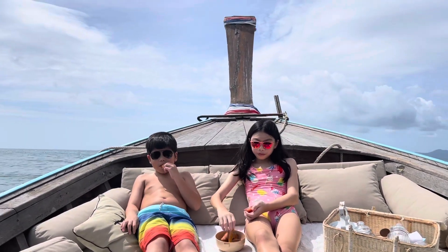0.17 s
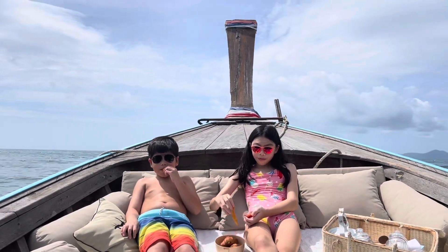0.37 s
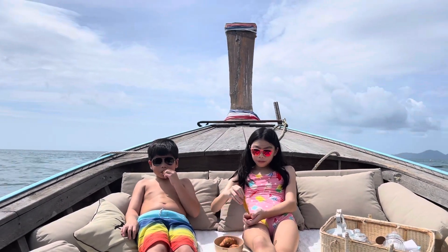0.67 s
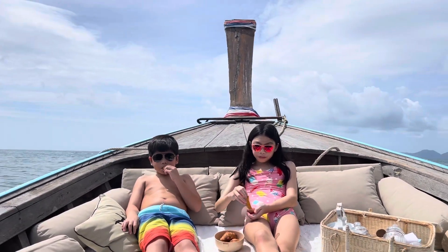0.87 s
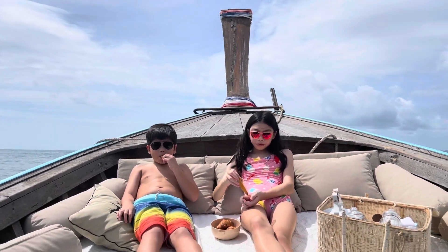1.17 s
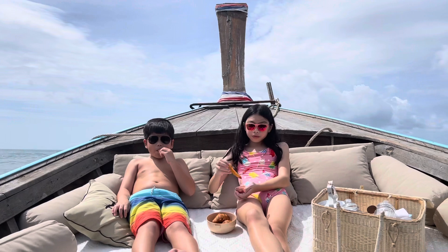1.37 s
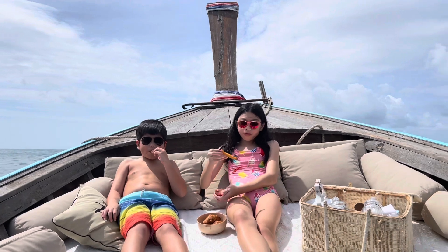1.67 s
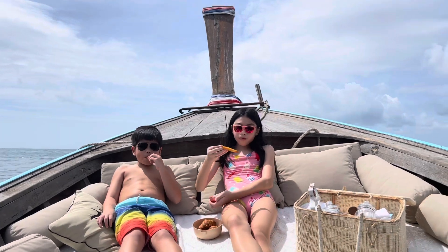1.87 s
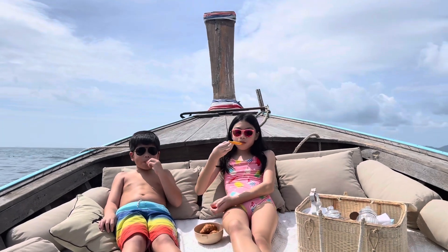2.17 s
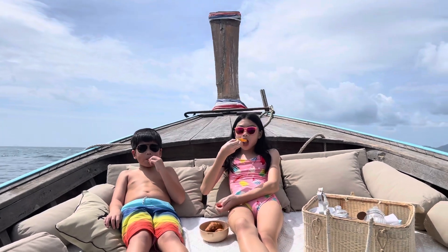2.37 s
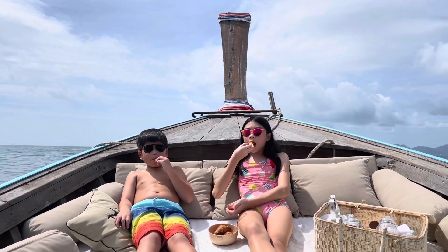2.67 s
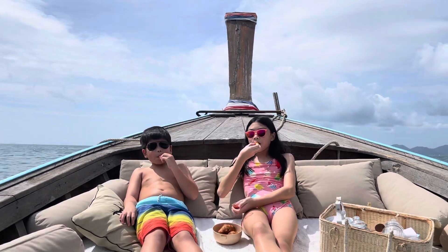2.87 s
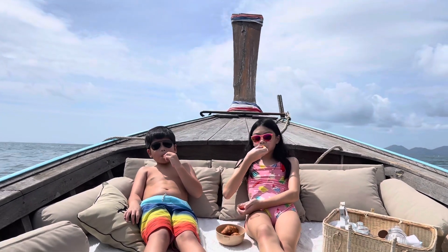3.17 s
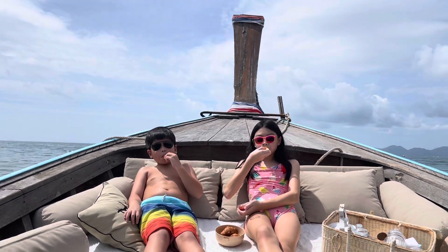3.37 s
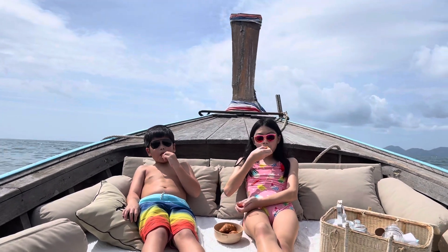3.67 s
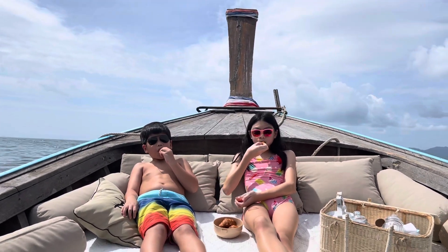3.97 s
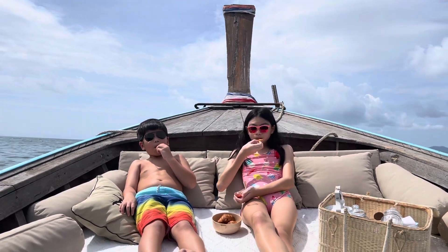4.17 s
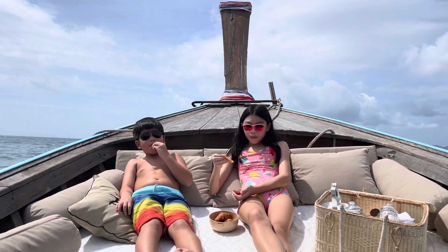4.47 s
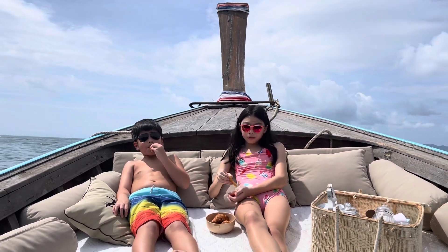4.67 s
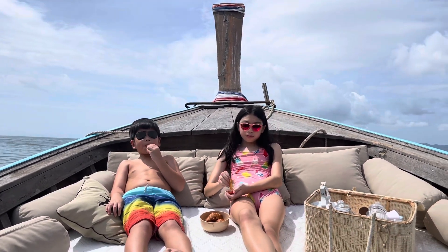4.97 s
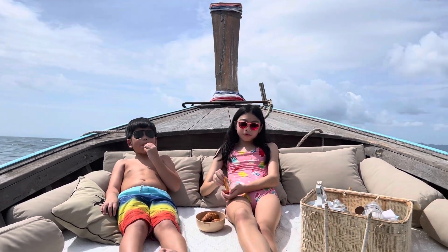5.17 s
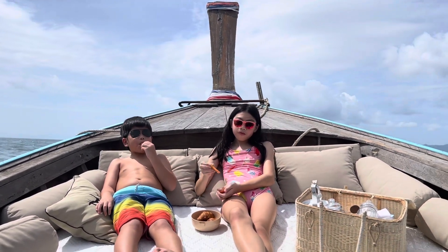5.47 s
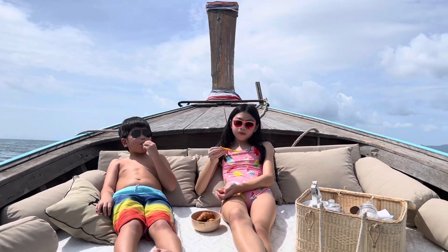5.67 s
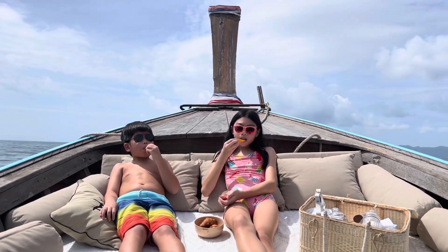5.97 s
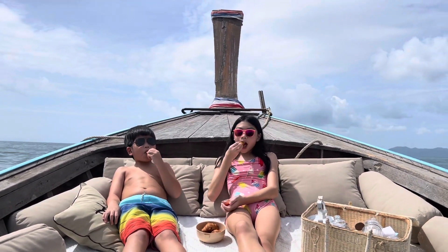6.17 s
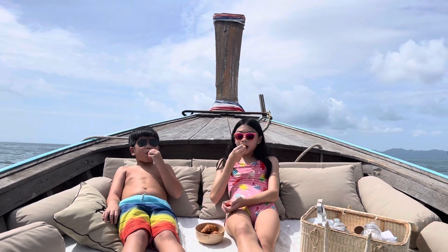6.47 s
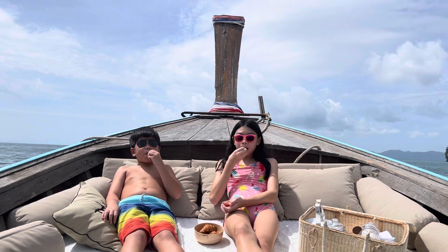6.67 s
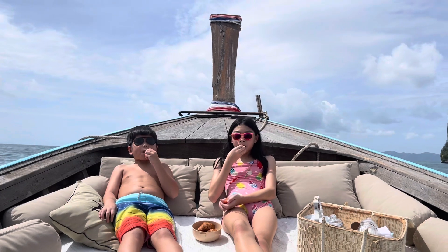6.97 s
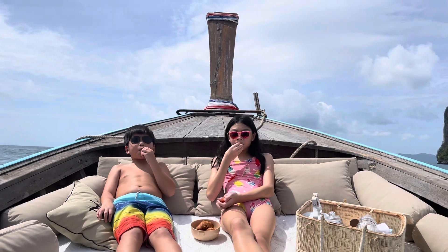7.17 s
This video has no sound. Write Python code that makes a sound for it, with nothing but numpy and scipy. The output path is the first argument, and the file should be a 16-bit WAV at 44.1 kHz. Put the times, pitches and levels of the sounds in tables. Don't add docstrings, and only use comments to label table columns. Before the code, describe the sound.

A diesel boat engine runs throughout, heard from the open wooden deck ahead of it. A deep throbbing drone near 75 Hz wavers as the hull resonates, beneath a fast, puffing, clattering mid-range roar and a faint fuzzy whistle around 5.5 kHz. From 0 to 3.4 s, gusts buffet the stereo microphone with low rumble, flutter and blunt slaps, especially heavy around 1.1-1.4 s. Foamy spray hisses softly alongside, swelling near 0.2, 0.9, 1.3 and 2.8 s. After 3.4 s the wind gradually eases, though isolated thumps continue through 4.3-5 s. A tiny sharp water tick lands close at 4.7 s. Around 5.2 s the engine races slightly and its whistle rises and strengthens; another wash follows near 5.5 s. The engine then slackens, pitch sagging, in the calmest wind around 6-6.7 s, before gusts return by 7.2 s, with the engine still running.

```python
import sys
import numpy as np
from scipy import signal
from scipy.fft import rfft, irfft, next_fast_len
from scipy.io import wavfile
from scipy.ndimage import uniform_filter1d

SR = 44100
rng = np.random.default_rng(int(sys.argv[2]) if len(sys.argv) > 2 else 0)


def decibels_to_gain(level_db):
    exponent = np.asarray(level_db, float) / 20
    return 10 ** exponent


def bounce(signal):
    frames = np.transpose(np.atleast_2d(signal))
    limited = np.clip(frames, -1, 1)
    pcm = np.round(limited * 32767).astype(np.int16)
    wavfile.write(sys.argv[1], SR, pcm)


N = 323253
TIME = np.arange(N) / SR

# pitch_hz, likeness [0-1], right_lead [radians], left_over_right_db
PORT_SPREAD = [(60, 1, 0.29, -6.5), (494, 0.07, -0.53, 0.5), (1130, 0.62, -0.68, -1.5),
               (1780, 0.5, -0.14, -3), (2400, 0.3, -1.28, -1.5), (3840, 0.12, -0.36, 2.5),
               (5200, 0.36, -1, 2), (6900, 0.23, -0.34, 5), (7400, 0.3, 0.33, -1), (7640, .6, -1.1, 3),
               (8450, .99, 0, 0)]
# pitch_hz, likeness
PORT_SPREAD_TOP = [(8450, 1, 0), (8850, 1, 0), (9100, .8, 1.1), (9600, .8, 2.1), (9780, .9, 2.65),
                   (10050, .97, 3.03), (10150, 1, 3.1416), (10330, 1, 3.1416), (10450, .95, 3.4),
                   (10700, .85, 3.8), (11600, .85, 5.7), (11800, .95, 6.2832)]

CALM_WIND_DB = [-31, -25, -32, -35.5]
LULL_FOLLOW = [0.054, 1.0, 0.38, 0.58]
# start_s, level_db
WIND_LULL = [
    (0, 1),
    (3.4, 0),
    (5, -6.5),
    (5.4, -10.5),
    (6.7, -11),
    (7.33, -1),
]
# centre_s, half_length_s, rumble_alike_db, rumble_apart_db, flutter_db
WIND_GUSTS = [(.08, 0.076, 3, 2, 6), (.45, 0.17, 6.5, 5, 7.5), (.66, 0.074, 1.5, 3, 4),
              (.86, 0.16, 2, 5, 2), (1.2, 0.1, 8.5, 5, 7.5), (1.43, 0.094, -1, 4.5, 4.5),
              (1.71, 0.076, 6, 5, 3), (1.97, 0.11, 4.5, 3, 2), (2.31, .08, 1, 0, 8),
              (2.5, 0.37, 3, 2, -0.3), (2.8, .1, 2, 3, 6.5), (3.07, 0.085, 5.5, 10.5, 3.5),
              (3.31, 0.048, 9.5, 2, 5.5), (3.52, 0.12, 9, 0, -1), (1.03, 0.031, 0, -12, -1),
              (4.3, 0.22, 5, 8, 7), (4.59, 0.056, 7, -1, -1), (4.82, 0.082, 10.5, 7, 5),
              (4.98, 0.083, 4.5, 11, 3.5), (5.38, 0.096, 3, 1, 8.5), (5.92, 0.24, 3, 11.5, 2.5),
              (6.25, 0.2, 2.5, 4, 4.5), (6.88, 0.12, 1, 10.5, -7), (7.2, 0.15, 6.5, 4.5, 3.5)]
# start_s, left_over_right_db
WIND_SIDE = [
    (0, -0.5),
    (2.7, -0.4),
    (3.6, -1),
    (4.7, 0.2),
    (5.3, 0.5),
    (6.8, -0.5),
    (7.33, -.3),
]
# pitch_hz, level_db [per Hz]
RUMBLE_TONE = [(20, -30), (35, -8.5), (60, 0), (110, -1.5), (200, -8), (300, -18), (500, -29.5)]
# pitch_hz, level_db [per Hz]
RUMBLE_APART_TONE = [(25, -34), (38, -14), (62, -3.5), (110, -3.5), (200, -7.5), (300, -15), (500, -40)]
# pitch_hz, level_db [per Hz]
FLUTTER_TONE = [(120, -54), (220, -2.5), (320, 3), (500, -3.5), (800, -4.5), (1300, -19.5)]
# centre_s, peak [full scale], pitch_hz, length [cycles]
AIR_SLAPS = [(.372, .2, 350, 1.5), (.457, .2, 270, 1), (.485, .2, 220, 1), (.51, .13, 600, .8),
             (.67, .07, 650, 1.2), (.737, .2, 250, 1), (.8, .2, 240, 1), (1.136, .2, 700, 1.3),
             (1.1405, -.46, 380, 1.4), (1.204, -.3, 200, 1.2), (1.231, .28, 600, 1), (1.2495, -.6, 120, 1),
             (1.272, .12, 600, 1.2), (1.308, -.35, 170, .7), (1.4, -.3, 150, .7), (2.7, .18, 190, 4),
             (3.3, .2, 320, 1.2), (3.342, .3, 130, 1.2), (3.595, -.35, 170, .6), (3.631, .3, 280, .7),
             (3.642, .4, 160, .6), (4.32, .3, 210, 1), (4.335, .15, 500, 1.5), (4.654, .3, 150, .6),
             (4.727, -.35, 190, .8), (4.797, -.3, 110, .7), (6.453, -.35, 150, .6), (7.222, -.3, 150, .6)]

# pitch_hz, level_db [per Hz]
FOAM_TONE = [(1500, -6), (3000, 1.5), (5000, -5), (8300, -0.5), (10300, 3.5), (11500, 1.5), (12100, -6),
             (12500, -12), (12900, -18), (13300, -30)]
# centre_s, half_length_s, level_db [over steady foam]
BOW_WAVES = [(.2, .3, 5.5), (.9, 0.15, 4.5), (1.3, 0.15, 9.5), (1.53, 0.08, 5.5), (2.65, .2, 2),
             (2.81, 0.097, 10), (3.0, 0.06, 6), (5.52, 0.21, 5), (6.57, .08, 3), (6.95, .04, 2),
             (7.28, .12, 3)]
# start_s, peak_db
CLOSE_DROP = [
    (4.705, -22),
]

# start_s, pitch_hz, level_db
WHISTLE = [(0, 5350, -47), (.27, 5280, -45), (.45, 5460, -43), (.7, 5490, -43), (.85, 5480, -51),
           (1.3, 5480, -49), (1.7, 5400, -46), (2, 5460, -50), (2.6, 5700, -48.5), (4, 5790, -49.5),
           (4.35, 5860, -42.5), (4.8, 5870, -44), (5.25, 5900, -40), (5.55, 5870, -42), (5.9, 5670, -49),
           (6.3, 5420, -47), (6.82, 5400, -44), (7.08, 5220, -48)]

# pitch_hz, level_db [per Hz]
ROAR_TONE = [(180, -10), (300, -10), (420, -11), (700, -8.5), (890, -8), (1150, -2.5), (1600, -6.5),
             (1780, -10), (2600, -13), (3600, -26), (6000, -25.5), (8300, -40)]
# pitch_hz, width_hz, level_db
BLOCK_RINGS = [(577, 82, -9.5), (778, 29, -22), (1033, 34, -11), (1114, 23, -15), (1328, 26, -20),
               (1450, 48, -19), (1604, 176, -9), (1880, 35, -15), (2066, 32, -19.5), (2264, 31, -23.5),
               (2780, 63, -30.5)]
# pitch_hz, width_hz, level_db
HULL_RINGS = [(255.5, 29.6, 2), (357, 26, -7)]
# centre_s, half_length_s, roar_db
PROPELLER_BITES = [
    (1.87, .06, -1),
    (2.0, 0.024, 1),
    (2.8, 0.13, 2),
    (3.3, 0.54, -1),
    (4.95, 0.32, 1),
    (6.45, 0.077, 0),
    (7.0, 0.16, -2),
]

# start_s, crank_speed [rev/s]
CRANK_SPEED = [(0, 35.9), (.2, 36), (.8, 38.5), (1.4, 38.1), (1.8, 37.2), (2.2, 39.1), (2.8, 39.2),
               (3, 38.5), (3.8, 38.1), (4.2, 39), (4.7, 38.7), (5, 40.2), (5.4, 40.3), (5.8, 37.7),
               (6.4, 36.7), (6.8, 36.8), (7.1, 35.8), (7.33, 35.7)]
# order [times crank speed], panel followed [index], level_db [against that panel]
CRANK_ORDERS = [(2, 0, 0), (3, 1, -.3), (4, 2, 0), (1, 1, -3.5), (5, 2, -8), (6, 1, -5), (2.5, 1, -9),
                (1.5, 2, -14), (6.5, 2, -8), (7, 2, -9), (9, 2, -16), (9.5, 2, -15)]
# order picked out, pitch_hz, width_hz, peak_rms_db
HULL_PANELS = [
    (2, 73, 5, -20.5),
    (3, 119.5, 4, -26),
    (4, 152, 18, -26.5),
]
# centre_s, half_length_s, order_2_db, order_3_db, order_4_db
HULL_SWELLS = [(0, 0.13, -18, 0, 2), (.45, 0.19, -1, -4, -8.5), (.8, 0.098, -18, -4, -4),
               (1.2, 0.48, -1, 3, 1), (1.97, 0.18, 5, 2, -8), (2.2, 0.079, -7, -1, -1),
               (2.6, 0.11, 2.5, -1, -6.5), (3.1, 0.17, -8, 3, -1), (3.5, .2, -3, 4, -1.5),
               (3.75, 0.15, 3, 2, -1.5), (4, 0.095, -8, -3, 2.5), (4.2, 0.084, 8.5, 0, 1),
               (4.4, .09, -1, 0, -0.5), (4.9, 0.18, 2.5, -3.5, -2.5), (5.75, 0.19, -9, -1, 0.5),
               (6.6, 0.17, 4, 3, -0.5), (7.2, 0.12, -4, 6, 1.5), (7.36, .1, 4, 0, -2)]

# from_hz, silent [% of the time]
FAINT_TOP = [(12440, 55), (12850, 78), (13000, 93)]


def evened(x):
    return x / np.sqrt(np.mean(x ** 2) + 1e-20)


def curves(rows):
    s, *columns = np.transpose(rows)
    return [np.interp(TIME, s, column) for column in columns]


def bumps(rows):
    s, half, *columns = np.transpose(rows)
    coarse = TIME[::64]
    bells = np.exp(-((coarse[:, None] - s) / half) ** 2)
    return np.array([np.interp(TIME, coarse, bells @ column) for column in columns])


def wander(hz, count=1):
    size = max(int(SR / hz), 1)
    smooth = uniform_filter1d(rng.standard_normal((count, N)), size)
    return evened(uniform_filter1d(smooth, size))


def coloured(x, points):
    hz, db = np.transpose(points)
    size = next_fast_len(N)
    log_hz = np.log(np.fft.rfftfreq(size, 1 / SR) + 1)
    gain = decibels_to_gain(np.interp(log_hz, np.log(hz), db, left=-90, right=-90))
    return evened(irfft(rfft(x, size) * gain, size)[..., :N])


def resonate(x, hz, width):
    r = np.exp(-np.pi * width / SR)
    if np.isscalar(hz):
        pole = r * np.exp(2j * np.pi * hz / SR)
        return 2 * signal.lfilter([1 - r], [1, -pole], x).real
    turn = np.exp(2j * np.pi * np.cumsum(hz) / SR)
    return 2 * (turn * signal.lfilter([1 - r], [1, -r], x / turn)).real


def patchy(x, depth_db, bins, frames):
    z = signal.stft(x, nperseg=512)[2]
    patches = uniform_filter1d(rng.standard_normal(z.shape[1:]), max(int(bins), 1), 0)
    patches = uniform_filter1d(patches, max(int(frames), 1), 1)
    return evened(signal.istft(z * decibels_to_gain(depth_db * evened(patches)), nperseg=512)[1][:, :N])


def ports(x, twin):
    size = next_fast_len(N)
    f = np.fft.rfftfreq(size, 1 / SR)
    rows = PORT_SPREAD[:-1] + [row + (0,) for row in PORT_SPREAD_TOP]
    hz, like, lead, pan_db = np.transpose(rows)
    like = np.clip(np.interp(f, hz, like), 0, 1)
    left = rfft(x, size)
    right = like * left + np.sqrt(1 - like ** 2) * rfft(twin, size)
    right = right * np.exp(1j * np.interp(f, hz, lead))
    tilt = decibels_to_gain(np.interp(f, hz, pan_db) / 2)
    return irfft(np.array([left * tilt, right / tilt]), size)[:, :N]


def air_slaps():
    out = np.zeros((2, N))
    for s, peak, hz, cycles in AIR_SLAPS:
        u = np.arange(-1800, 1800) / SR * hz
        swing = peak * np.exp(-(u / cycles) ** 2) * np.cos(2 * np.pi * (u - .05 * u ** 2))
        out[:, round(s * SR) - 1800:][:, :len(u)] += swing
    return out


def wind():
    gusts = bumps(WIND_GUSTS)[[0, 1, 2, 2]]
    level_db = np.c_[CALM_WIND_DB] + np.c_[LULL_FOLLOW] * curves(WIND_LULL)[0] + gusts
    lump_db = np.array([[1.6], [2.5], [2], [2.5]])
    lumps = decibels_to_gain(lump_db * np.clip(wander(45.0, count=4) + .6 * wander(12.0, count=4), -3, 1.9))
    noise = rng.standard_normal((4, N)) * lumps
    common = decibels_to_gain(level_db[0] + 6.5) * coloured(noise[0], RUMBLE_TONE)
    common += decibels_to_gain(level_db[2] - 2.5) * coloured(noise[1], FLUTTER_TONE)
    apart = decibels_to_gain(level_db[1] + 0.7) * coloured(noise[2], RUMBLE_APART_TONE)
    apart += decibels_to_gain(level_db[3] + 1.0) * coloured(noise[3], FLUTTER_TONE)
    side = decibels_to_gain(1.75 * np.array([[.5], [-.5]]) * curves(WIND_SIDE)[0])
    return np.array([common + apart, common - apart]) * side + air_slaps()


def close_drop():
    out = np.zeros((2, N))
    t = np.arange(-20, 20) / SR
    for s, db in CLOSE_DROP:
        tick = decibels_to_gain(db) * np.exp(-(t / .00012) ** 2) * np.sin(2 * np.pi * 11900 * t)
        out[:, round(s * SR):][:, :len(t)] += tick
    return out


def spray():
    foam_db, drops_per_s = -44, 2500
    drop_size = decibels_to_gain(3.9 * np.minimum(rng.exponential(1, (2, N)), 5))
    drops = drop_size * (rng.random((2, N)) < drops_per_s / SR)
    fizz = rng.standard_normal((2, N)) + 0.45 * evened(drops * rng.standard_normal((2, N)))
    fizz *= decibels_to_gain(0.33 * wander(33.0))
    foam = patchy(coloured(fizz, FOAM_TONE), 1.0, 6.5, 6.5)
    return ports(*(foam * decibels_to_gain(foam_db + bumps(BOW_WAVES)[0]))) + close_drop()


def puffs(turns, sharp, uneven):
    decay = np.exp(-(2 * turns % 1) / 0.21)
    strength = 1 + uneven * np.sign(.5 - turns % 1) + .3 * (turns % 2 < .5)
    return 1 + sharp * decay * strength


def turbo(turns):
    hz, db = curves(WHISTLE)
    hz = hz * (1 + .009 * np.sin(2 * np.pi * turns) + .004 * wander(12.0)[0])
    noise = rng.standard_normal((2, N))
    lines = 0
    for ratio, width_hz, line_db in [(1, 90, 0), (1.036, 140, -5), (1.015, 500, -1.5)]:
        line = resonate(resonate(noise, hz * ratio, width_hz), hz * ratio, width_hz)
        lines = lines + decibels_to_gain(line_db) * evened(line)
    near, other = evened(lines * puffs(turns, 0.93, 0.65)) * decibels_to_gain(db - 0.5)
    return np.array([decibels_to_gain(3) * near, decibels_to_gain(-5) * (.3 * near + .95 * other)])


def roar(turns):
    roar_db, boom_db = -28, -36.5
    noise = rng.standard_normal((2, N)) * puffs(turns, 0.23, 0.91)
    block = sum(decibels_to_gain(db) * evened(resonate(noise, hz, width)) for hz, width, db in BLOCK_RINGS)
    hull = sum(decibels_to_gain(db) * evened(resonate(resonate(noise, hz, width), hz, width))
               for hz, width, db in HULL_RINGS)
    clatter = patchy(coloured(noise, ROAR_TONE) + block, 1.42, 3.5, 8.5)
    clatter = decibels_to_gain(roar_db + bumps(PROPELLER_BITES)[0]) * clatter
    return ports(*(clatter + decibels_to_gain(boom_db) * hull))


def drone(turns, speed):
    panel_db = [db - 10 * np.log10(1 + (2 * (order * speed - hz) / width) ** 2)
                for order, hz, width, db in HULL_PANELS]
    level_db = bumps(HULL_SWELLS) + panel_db
    waver, phase = wander(4.0, count=len(CRANK_ORDERS)), rng.random(len(CRANK_ORDERS))
    total = 0
    for (order, panel, db), w, p in zip(CRANK_ORDERS, waver, phase):
        level = decibels_to_gain(level_db[panel] + db + 2.2 * w)
        total = total + level * np.cos(2 * np.pi * (order * turns + p))
    return np.sqrt(2) * total


def scene():
    speed = curves(CRANK_SPEED)[0]
    turns = np.cumsum(speed * (1 + .002 * wander(8.0)[0])) / SR
    hull_drone = drone(turns, speed) * decibels_to_gain([[-.4], [.4]])
    return wind() + spray() + turbo(turns) + roar(turns) + hull_drone


def roll_off(x):
    return signal.sosfilt(signal.butter(12, 13160, fs=SR, output="sos"), x)


def record(dry):
    cut = signal.sosfilt(signal.butter(2, 30, "highpass", fs=SR, output="sos"), dry)
    limited = 1.534 * np.tanh(cut / 1.5)
    hz, _, z = signal.stft(limited, SR, nperseg=2048)
    for edge_hz, share in FAINT_TOP:
        power = (abs(z[:, hz > edge_hz]) ** 2).sum((0, 1))
        z[:, hz > edge_hz] *= power > np.percentile(power, share)
    mix = signal.istft(z, SR, nperseg=2048)[1][:, :N]
    return roll_off(mix)


dry = scene()
out = record(dry)
bounce(out)
```